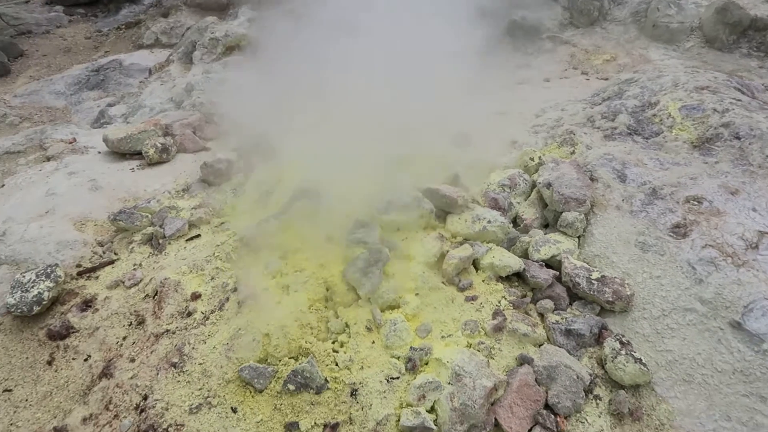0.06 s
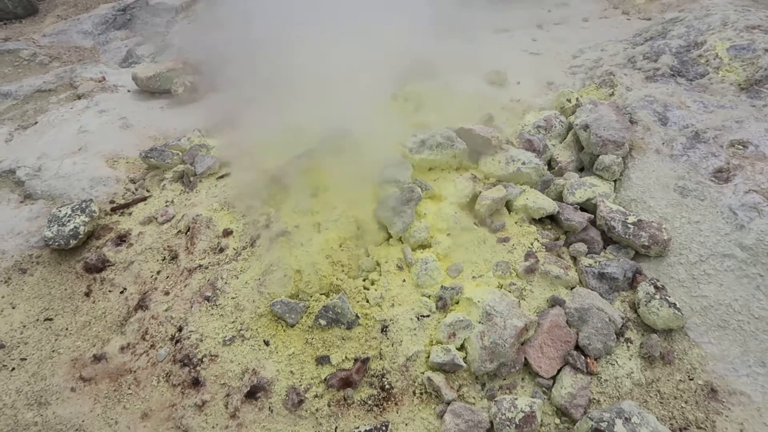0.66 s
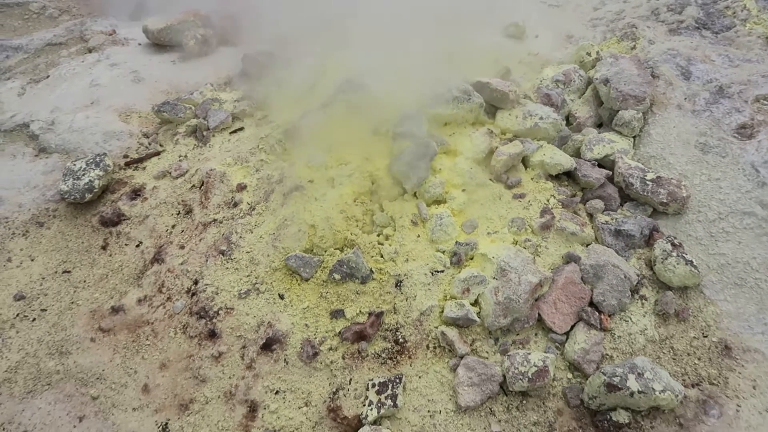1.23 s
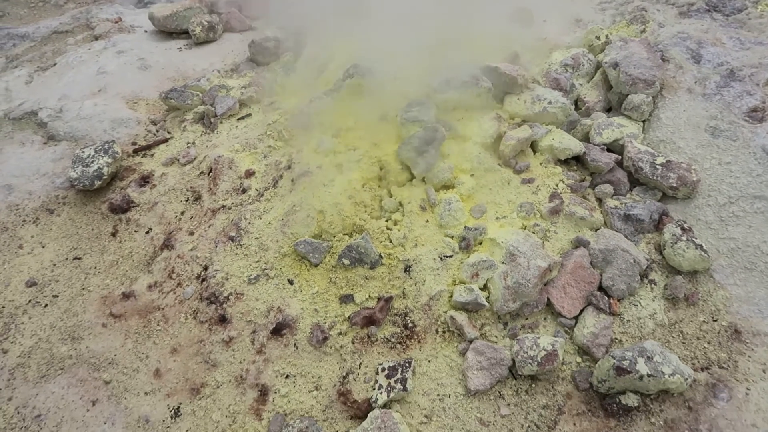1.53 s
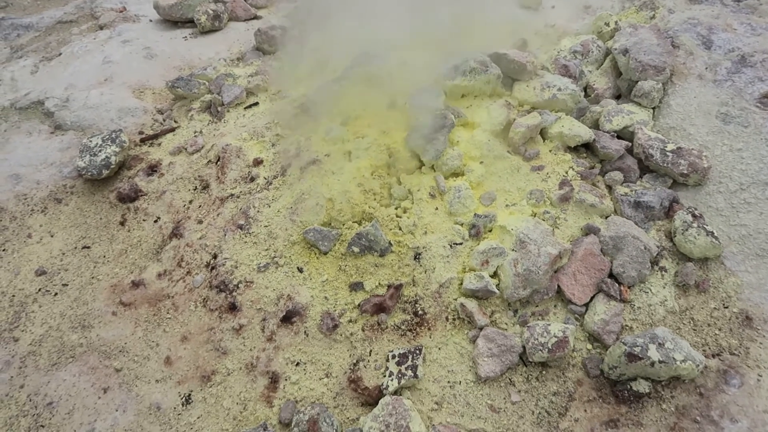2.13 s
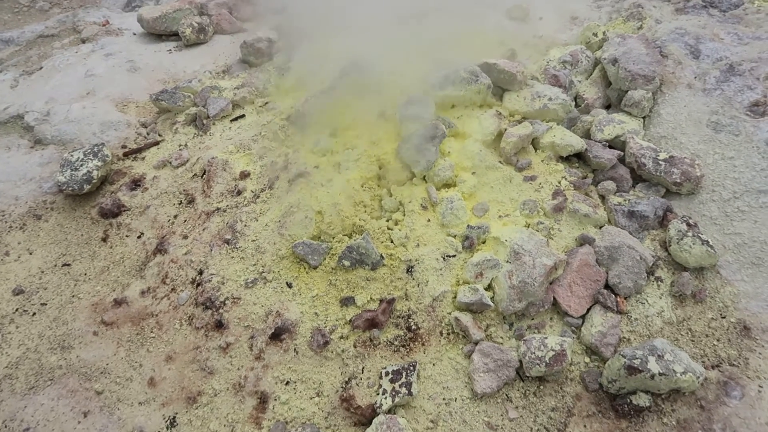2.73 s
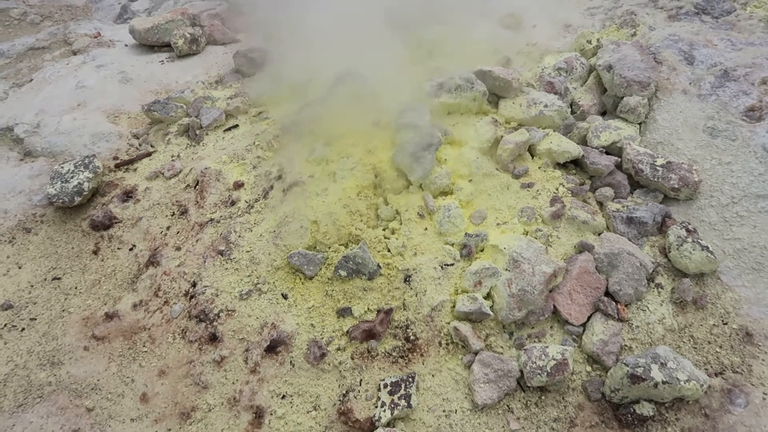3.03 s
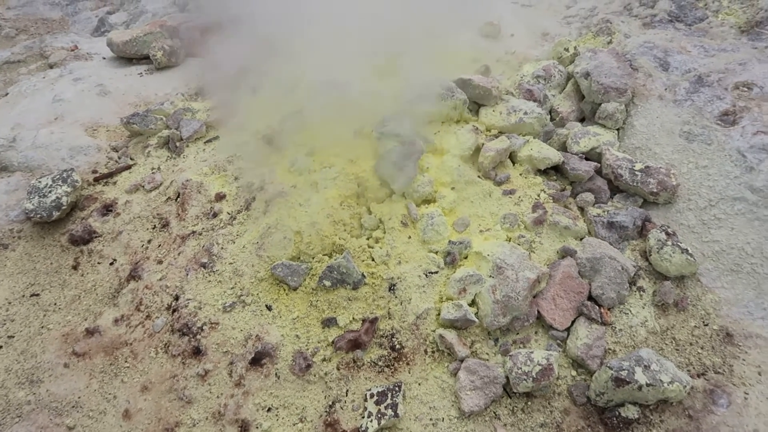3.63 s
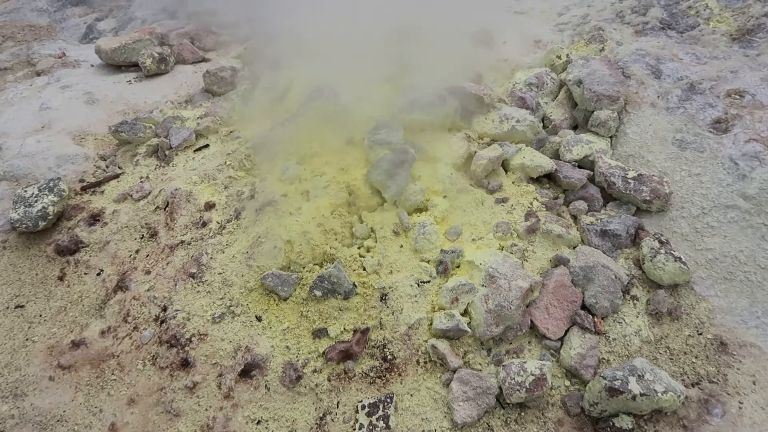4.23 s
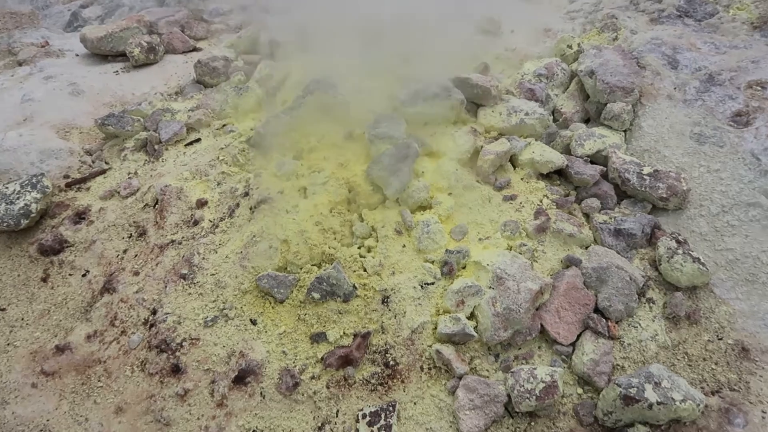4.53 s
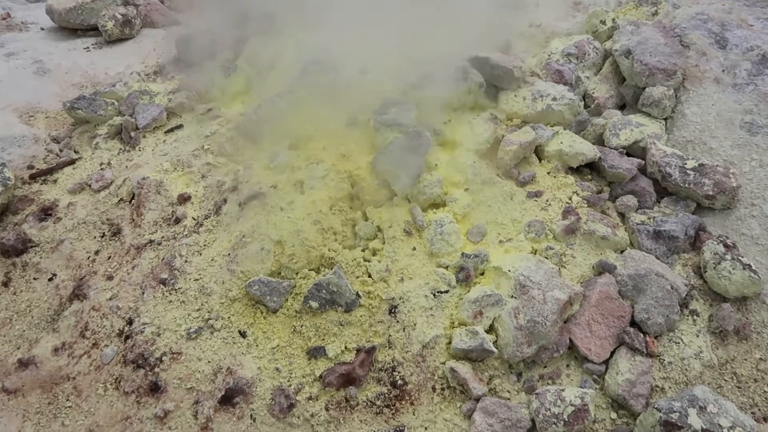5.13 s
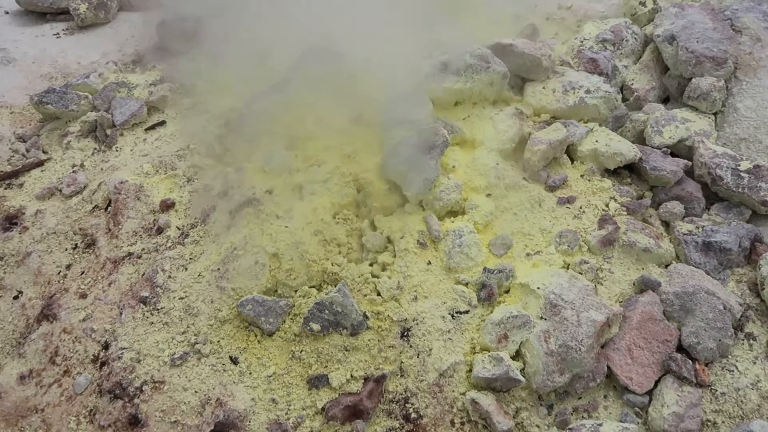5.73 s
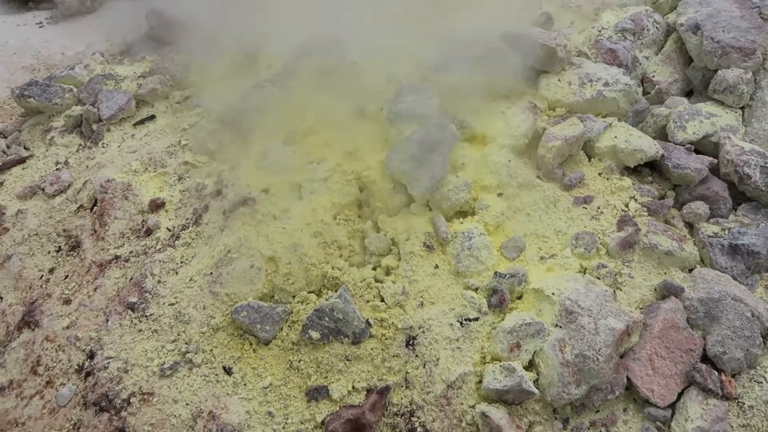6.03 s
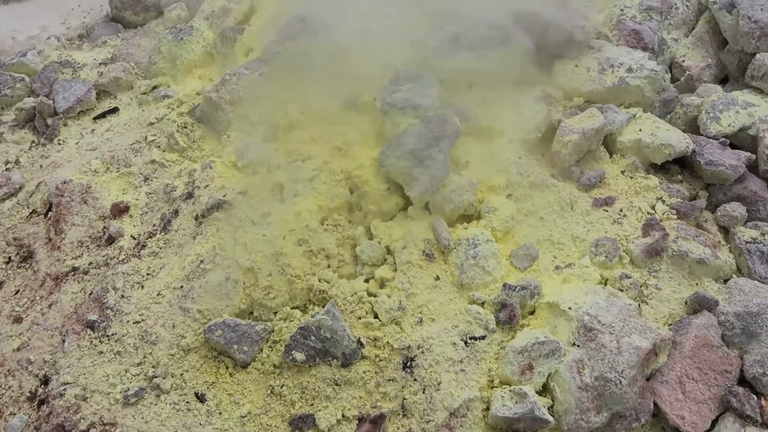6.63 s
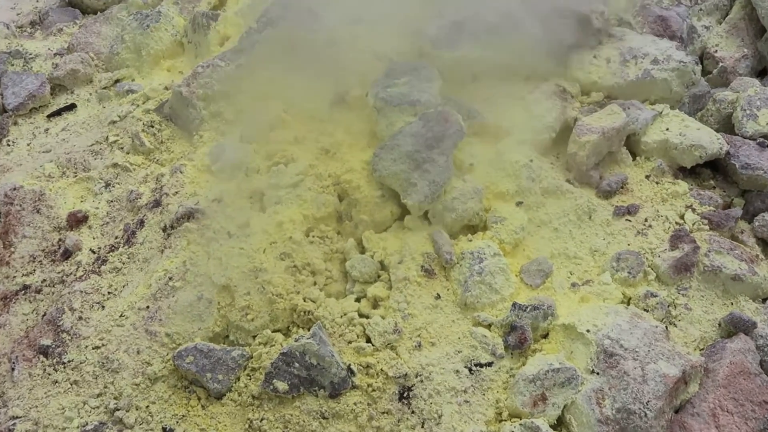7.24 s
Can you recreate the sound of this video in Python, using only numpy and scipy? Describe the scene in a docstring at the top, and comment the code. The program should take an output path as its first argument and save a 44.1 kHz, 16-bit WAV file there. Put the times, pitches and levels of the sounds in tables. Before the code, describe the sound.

A volcanic steam vent roars and hisses continuously for about seven seconds, heard outdoors from a couple of metres away. The sound is a broad rush with a fine sizzle on top and a faintly hollow colour that slides as the microphone moves. Wind hits the microphone from the very start in short, low, slightly raspy thumps over a fluttering rumble. The buffets come in irregular clusters, hardest in the first half second, around 0.9 and 1.4 seconds, between 2 and 2.8 seconds, and near 3.4 seconds. Each hard one pushes the whole sound down, and the hiss swells back over the next second. From about 3.6 seconds the wind eases and the steam comes forward, fullest around 4.5 to 5 seconds. Lighter buffets return between 5 and 6.2 seconds while the steam softens a little, then it hisses on with only faint wind bumps.

```python
"""At a fumarole in a pile of sulphur-crusted stones, a couple of metres from a hand-held camera.
The steam jet roars and hisses steadily; echoes off the ground and the stones give it a hollow colour
that slides as the camera moves. Wind hits the microphone in short, low buffets over a fluttering rumble.
Each hard buffet pushes the recorder's gain down, and the hiss swells back over the next second."""
import sys
import numpy as np
from scipy import signal
from scipy.fft import rfft, irfft, next_fast_len
from scipy.io import wavfile
from scipy.ndimage import uniform_filter1d, map_coordinates

SR = 44100
rng = np.random.default_rng(int(sys.argv[2]) if len(sys.argv) > 2 else 0)


def log_audio(samples):
    """Write samples as a 16-bit WAV file to the path given in sys.argv[1]."""
    # one column per channel
    frames = np.atleast_2d(samples).T
    # limit to full scale, then quantise
    limited = np.clip(frames, -1, 1)
    pcm = np.round(limited * 32767).astype(np.int16)
    wavfile.write(sys.argv[1], SR, pcm)


N = 320607
TIME = np.arange(N) / SR

# rise and fall of the jet at the microphone: time_s, relative_db
JET_LEVEL = [(0, -23), (.45, -23), (.51, -22.5), (.75, -22), (.82, -21), (.9, -20), (1.0, -19.5),
             (1.33, -19.5), (1.55, -22.5), (1.85, -21.5), (2.05, -23), (2.4, -22), (2.7, -23.5),
             (3.02, -21), (3.25, -22.5), (3.5, -19.5), (3.72, -21.3), (4.0, -19.5), (4.14, -20.5),
             (4.38, -18.5), (4.53, -18.5), (4.65, -18.5), (4.9, -19.5), (5.05, -20.5), (5.45, -22.5),
             (5.65, -25.5), (5.95, -22), (6.2, -25.5), (6.6, -24), (6.9, -22.5), (7.27, -22.5)]
# spectrum of the steam: frequency_hz, relative_db
JET_SPECTRUM = [(30, -28), (100, -5), (240, -1.5), (490, -2), (850, -4.5), (1150, -2.5), (1650, -5),
                (2150, -7), (3000, -3.5), (5100, -11), (6400, -12), (8000, -18), (11500, -22),
                (15000, -32.5)]
# cavities between the stones of the vent: pitch_hz, width_hz, boost_db
VENT_CAVITIES = [(650, 180, 4), (995, 117, 4), (1360, 290, 4), (1944, 120, 3), (2547, 270, 4),
                 (3430, 370, 2.5), (4240, 530, 1.3), (6060, 280, 2.5), (6730, 430, 2)]
# sizzle of the fine spray in the jet: time_s, boost_db
SPRAY_SIZZLE = [(0, 1.5), (.55, -1.5), (.72, -2), (.9, 1.5), (1.0, -1), (1.8, 0), (2.08, 1), (2.28, -2.5),
                (2.5, 1), (3.45, -1.3), (4.35, 2), (4.53, -2.5), (4.62, 1), (5.35, 1), (5.65, -1.5),
                (5.97, 0.5), (6.17, 0.5), (6.55, 2), (6.85, -2.5), (7.27, 0)]
# echoes just behind the direct sound: time_s, ground_lag_ms, stone_edge_lag_ms, gain_of_each
NEAR_ECHOES = [(.7, 1.25, 1.34, .16), (1.3, 1.29, 1.64, .1), (2.6, 1.4, 1.8, .07), (3.1, 1.63, 1.94, .1),
               (3.5, 1.67, 1.97, .15)]
# the hollow colour along the camera's path: time_s, peak_hz, peak_db, dip_hz, dip_db
HOLLOW_GLIDE = [(.3, 2780, -1, 2200, 1), (.8, 2800, 1.5, 2100, 0.5), (1.0, 3270, 1.5, 2000, 0.5),
                (1.8, 3290, 1, 1880, -3), (2.5, 3100, 2, 1810, 0), (3.3, 2970, 0, 1620, 0.5),
                (4.2, 2950, 0, 1560, 1)]
# stereo width of the jet, greatest in the treble: frequency_hz, side_gain_db
JET_SIDE_SPECTRUM = [(100, -41), (1200, -110), (2400, -27.5), (4400, -17), (8000, -8.5), (11000, -3.5),
                     (15000, -19)]
# echoes off the flanking stones add or cancel between left and right: centre_hz, width_hz, side_gain_db
FLANK_INTERFERENCE = [(2700, 310, 12), (3400, 470, -23), (4300, 260, 6.5), (4760, 220, 6), (5100, 250, 4),
                      (8700, 1500, -3.5)]
# width of the hiss as the camera moves: time_s, side_gain_db
HISS_SPREAD = [(0, 6.5), (.9, 2.5), (2.6, 1.5), (4.2, 2.5), (6.2, 0), (7.27, 0.5)]

# strength of the wind at the microphone: time_s, relative_db
BREEZE_LEVEL = [(0, -20), (.21, -41), (.72, -46), (.87, -17), (1.17, -21), (1.29, -43), (1.64, -38),
                (1.85, -27.5), (2.4, -20.5), (2.92, -35), (3.1, -26), (3.45, -18.5), (3.66, -45),
                (4.3, -33), (5.0, -34.5), (5.78, -32), (5.98, -17), (6.25, -43), (6.5, -35.5), (7.27, -40)]
# hard eddies that strike the microphone: centre_s, relative_db, length_s, rasp_offset_db
HARD_EDDIES = [(.012, -7, 0.014, -8.5), (.035, -9.5, 0.026, -4.5), (.08, -4, 0.0065, -4.5),
               (.101, -5.5, 0.009, -6), (.121, -8, .007, -11), (.143, -7, 0.0094, 0),
               (.162, -1, 0.0082, -5.5), (.182, -10, 0.011, -9), (.286, -6, 0.0052, -7),
               (.312, -8, 0.011, -4), (.328, -13, 0.016, -5), (.354, -16, 0.0082, -7),
               (.376, -19.5, 0.011, -21.5), (.526, -18, 0.007, -14), (.538, -5, 0.0042, -2.5),
               (.553, -11, 0.0057, -8), (.747, -15.5, .012, -16), (.8, -5, 0.012, -10),
               (.815, -11, 0.014, -16), (.85, -12, .006, -12), (.892, -13, 0.028, -10),
               (.923, -2.5, 0.0072, 1.5), (.953, -6, 0.021, -9), (.98, -15, 0.014, -6),
               (1.0, -13, 0.0085, 9), (1.021, -10.5, 0.016, -10), (1.047, -15, 0.01, -20),
               (1.066, -15, 0.011, -16), (1.089, -9.5, 0.0062, -6), (1.16, -12, 0.025, -3),
               (1.19, -11, 0.016, -2), (1.213, -5.5, 0.012, 0.5), (1.33, -4, 0.0084, -6),
               (1.397, -1, 0.019, -13), (1.42, 3, 0.0083, -5.5), (1.473, -8, .026, -11.5),
               (1.532, -13, 0.0091, -14), (1.706, -13.5, 0.022, -18), (1.806, -10.5, 0.013, -12),
               (1.833, -10.5, 0.0053, -9), (1.869, -8.5, 0.012, -10), (1.942, -13.5, 0.0042, -25),
               (2.015, -3, 0.013, -8), (2.144, -11, 0.025, -13.5), (2.18, -13, 0.011, -15),
               (2.277, -10.5, 0.011, -17), (2.311, -18, 0.0063, -24), (2.348, -10, 0.016, -16),
               (2.424, -6.5, 0.015, -5.5), (2.457, -12, 0.0081, -13), (2.508, -24, .012, -19),
               (2.568, -15, 0.0094, -12), (2.587, -6.5, 0.0066, -12.5), (2.627, -5.5, 0.013, -10),
               (2.683, -11, 0.0084, -12), (2.732, -13.5, 0.026, -11), (2.801, -3.5, 0.0053, -8),
               (2.836, -6.5, 0.015, -14.5), (2.873, -15, 0.015, -19.5), (2.969, -19.5, 0.0085, -25),
               (3.05, -19, 0.011, -26), (3.073, -9.5, 0.01, -7.5), (3.108, -16, 0.013, -12),
               (3.143, -9, 0.024, -7.5), (3.162, -1, 0.0032, -8.5), (3.21, -14, 0.015, -13.5),
               (3.353, 0.5, 0.0089, -5.5), (3.374, 0.5, 0.0093, -14), (3.424, -2.5, 0.012, -5),
               (3.46, -10, 0.014, -14), (3.556, -9, 0.015, -11), (3.705, -23, 0.018, -21),
               (3.825, -23, 0.0096, -23), (3.945, -27, .022, -25), (4.052, -12, 0.028, -15),
               (4.135, -29, 0.028, -22), (4.249, -13, 0.026, -14.5), (4.286, -17.5, 0.015, -24),
               (4.325, -23, 0.013, -18), (4.39, -25.5, 0.0091, -18), (4.435, -19, 0.0073, -26),
               (4.448, -5, 0.0065, -17), (4.485, -13.5, 0.0069, -12), (4.584, -18, .007, -17),
               (4.601, -15.5, 0.0068, -22), (4.712, -20, 0.018, -17.5), (4.782, -13.5, 0.012, -16),
               (4.803, -8, 0.0053, -12), (4.826, -17, 0.0052, -20), (4.904, -21.5, 0.01, -14),
               (4.94, -22.5, .018, -19), (5.012, -24, 0.0052, -30), (5.078, -12.5, 0.013, -17.5),
               (5.101, -12, .006, -12), (5.128, -10, 0.022, -12), (5.172, -21, .007, -18),
               (5.284, -8, 0.018, -9), (5.319, -10.5, 0.0066, -6), (5.376, -14, 0.02, -20),
               (5.399, -19, .008, -20), (5.425, -12.5, 0.019, -11), (5.468, -22, 0.0096, -14),
               (5.556, -8.5, 0.0037, -14), (5.578, -20, 0.032, -20), (5.68, -25, 0.01, -23),
               (5.7, -10.5, 0.0037, -16), (5.759, -19, 0.0058, -17), (5.864, -18.5, 0.024, -21.5),
               (5.921, -15.5, 0.013, -11), (5.948, -10.5, 0.015, -12), (5.987, -9, 0.0048, -11),
               (6.02, -20, 0.0091, -10), (6.064, -10.5, 0.0046, -14.5), (6.098, -17, 0.018, -19),
               (6.164, -12.5, 0.029, -13), (6.332, -27, 0.0057, -23.5), (6.361, -23.5, 0.006, -24),
               (6.43, -27, 0.0099, -20), (6.5, -25, 0.018, -20), (6.572, -30, 0.0059, -21),
               (6.649, -17, 0.015, -11), (6.803, -18.5, 0.012, -18), (6.996, -24, 0.0053, -28),
               (7.083, -15, 0.0064, -19), (7.126, -28, .009, -24), (7.203, -21, 0.018, -26.5)]
# rumble and thump of the wind: frequency_hz, relative_db
WIND_SPECTRUM = [(20, -50), (45, -20), (70, -13), (100, -9.5), (150, -4), (250, 0.5), (470, 0), (530, -7),
                 (740, -11.5), (880, -65), (1600, -57), (4000, -71)]
# rasp of the eddies: frequency_hz, relative_db
RASP_SPECTRUM = [(400, -40), (640, 8), (850, 9), (1100, 1), (1400, -0.5), (1850, -9.5), (3000, -25),
                 (8000, -40)]
# the part of the buffets that differs between the microphone ports: frequency_hz, relative_db
WIND_SIDE_SPECTRUM = [(60, -23), (160, -13), (300, 14.5), (430, 21.5), (600, 17), (1200, -23), (2500, -7),
                      (8000, -18)]
# the part of the rasp that differs between the ports: frequency_hz, relative_db
RASP_SIDE_SPECTRUM = [(400, -44), (700, 6), (950, 9), (1400, 0), (2000, -5.5), (2800, -6), (4000, -36),
                      (8000, -45)]


def vent(gain_db=3.0, flank_lag_ms=0.89, flank_db=-5.0, scatter_db=-3.5):
    """The jet from a couple of metres, with its echoes; flanking stones widen the treble."""
    ground_ms, edge_ms, echo_gain = curves(NEAR_ECHOES)
    jet = steam()
    # the rough crust mirrors only the longer waves, and a wave bent at an edge comes back inverted
    mirrored, _ = split(jet, hz=9000)
    echoes = echo_gain * (delayed(mirrored, ground_ms) - delayed(mirrored, edge_ms))
    mid = sliding_hollow(jet + echoes)
    reflection = undb(flank_db) * delayed(jet, flank_lag_ms)
    scatter = undb(scatter_db) * steam()
    side = colour(reflection + scatter, JET_SIDE_SPECTRUM, FLANK_INTERFERENCE)
    side *= undb(curves(HISS_SPREAD)[0])
    return np.array([mid + side, mid - side]) * undb(curves(JET_LEVEL)[0] + gain_db)


def steam(surge_db=0.43, roar_flutter_db=0.6, hiss_flutter_db=0.62, spray_flutter_db=1.5):
    """Large eddies roar, small ones hiss, fine spray sizzles; all surge together, each flutters alone."""
    roar, treble = split(noise(JET_SPECTRUM, VENT_CAVITIES), hz=1690)
    hiss, spray = split(treble, hz=6700)
    roar = roar * undb(roar_flutter_db * wander(rate_hz=37))
    hiss = hiss * undb(hiss_flutter_db * wander(rate_hz=37))
    spray = spray * undb(curves(SPRAY_SIZZLE)[0] + spray_flutter_db * wander(rate_hz=48))
    return (roar + hiss + spray) * undb(surge_db * wander(rate_hz=32))


def sliding_hollow(x, peak_width_hz=300, dip_width_hz=420):
    """A ringing gap and a cancelled band, both shifting in pitch and strength as the camera moves in."""
    peak_hz, peak_db, dip_hz, dip_db = curves(HOLLOW_GLIDE)
    ringing = x + (undb(peak_db) - 1) * band(x, peak_hz, peak_width_hz)
    return ringing + (undb(dip_db) - 1) * band(ringing, dip_hz, dip_width_hz)


def wind(boom_db=-0.3, thump_db=1.77, rasp_db=-0.5, breeze_db=-4, flutter_db=4,
         side_db=-23.5, side_rasp_db=-9):
    """Eddies boom, thump and rasp right on the microphone, over a fluttering rumble."""
    boom, thump, rasp = eddies()
    breeze = undb(curves(BREEZE_LEVEL)[0] + breeze_db + flutter_db * wander(rate_hz=30))
    deep_pressure = np.hypot(boom * undb(boom_db), breeze)
    body_pressure = np.hypot(thump * undb(thump_db), breeze)
    deep, body = split(churn(WIND_SPECTRUM), hz=284)
    mid = deep_pressure * deep + body_pressure * body + undb(rasp_db) * rasp * churn(RASP_SPECTRUM)
    # both ports feel nearly the same; the smaller the eddy, the more they differ
    side = undb(side_db) * body_pressure * noise(WIND_SIDE_SPECTRUM)
    side += undb(side_rasp_db) * rasp * noise(RASP_SIDE_SPECTRUM)
    return np.array([mid + side, mid - side])


def eddies(rise_steepness=2.0, fall_steepness=1.65, thinning=0.87, usual_rasp_db=-12):
    """Envelopes of boom, thump and rasp: each eddy hits within milliseconds and trails a short wake."""
    power = np.zeros((3, N))
    for centre_s, level_db, length_s, rasp_db in list(HARD_EDDIES) + small_eddies():
        near = slice(max(int((centre_s - .1) * SR), 0), int((centre_s + .1) * SR))
        age = 2 * (TIME[near] - centre_s) / length_s
        steepness = np.where(age < 0, rise_steepness, fall_steepness)
        # small, fast eddies rasp more and boom less
        boom_db = level_db - thinning * (rasp_db - usual_rasp_db)
        peak_power = undb([[boom_db], [level_db], [level_db + rasp_db]]) ** 2
        power[:, near] += peak_power / (1 + np.abs(age) ** (2 * steepness))
    return np.sqrt(power)


def small_eddies(per_s=18, lift_db=5.5, scatter_db=4, length_s=0.0072, rasp_db=-23):
    """Light buffets at chance moments, following the wind's strength; rows as in HARD_EDDIES."""
    count = int(per_s * N / SR)
    jitter, size = rng.random((count, 2)).T
    times_s = (np.arange(count) + jitter) / per_s
    levels_db = np.interp(times_s, *np.transpose(BREEZE_LEVEL)) + lift_db + scatter_db * (2 * size - 1)
    return [(centre_s, level_db, length_s, rasp_db) for centre_s, level_db in zip(times_s, levels_db)]


def churn(spectrum, span_s=0.0115):
    """Turbulence whose strength stays even over the life of one eddy."""
    turbulence = noise(spectrum)
    local_power = uniform_filter1d(turbulence ** 2, int(span_s * SR))
    return turbulence / np.sqrt(local_power + 0.095)


def gain_control(x, ceiling_db=-11.5, recovery_db_per_s=8, detector_s=0.0082, attack_s=0.0019,
                 start_duck_db=12):
    """The recorder's gain starts low, climbs steadily and drops fast when the level tops the ceiling."""
    power = uniform_filter1d(np.mean(x ** 2, axis=0), int(detector_s * SR))
    excess_db = np.maximum(10 * np.log10(np.maximum(power, 1e-12)) - ceiling_db, 0)
    recovered_db = recovery_db_per_s * TIME
    wanted_db = np.maximum.accumulate(np.maximum(excess_db + recovered_db, start_duck_db)) - recovered_db
    pole = np.exp(-1 / (attack_s * SR))
    duck_db = start_duck_db + signal.lfilter([1 - pole], [1, -pole], wanted_db - start_duck_db)
    return x * undb(-duck_db)


def undb(db):
    """Decibels to gain."""
    return 10 ** (np.asarray(db) / 20)


def curves(table):
    """The columns of a table, joined by straight lines in time."""
    times_s, *columns = np.transpose(table)
    return [np.interp(TIME, times_s, column) for column in columns]


def colour(x, spectrum, peaks=()):
    """Filter by frequency_hz, gain_db points, with centre_hz, width_hz, boost_db resonances on top."""
    size = next_fast_len(N)
    points_hz, points_db = np.transpose(spectrum)
    bins_hz = np.maximum(np.fft.rfftfreq(size, 1 / SR), 1)
    gain_db = np.interp(np.log(bins_hz), np.log(points_hz), points_db)
    for centre_hz, width_hz, boost_db in peaks:
        gain_db += boost_db / (1 + (2 * (bins_hz - centre_hz) / width_hz) ** 2)
    return irfft(rfft(x, size) * undb(gain_db), size)[:N]


def noise(spectrum, peaks=()):
    """Turbulence of a given colour, rms 1."""
    x = colour(rng.standard_normal(N), spectrum, peaks)
    return x / x.std()


def wander(rate_hz):
    """A smooth random drift, standard deviation 1."""
    steps = rng.standard_normal(N // 50)
    drift = map_coordinates(steps, [TIME * rate_hz], order=2, mode="wrap")
    return drift / drift.std()


def split(x, hz):
    """The parts of a sound under and over a frequency."""
    low = signal.sosfiltfilt(signal.butter(2, hz, fs=SR, output="sos"), x)
    return low, x - low


def delayed(x, lag_ms):
    """A sound heard after a steady or moving lag."""
    return map_coordinates(x, [np.arange(N) - lag_ms * SR / 1000], order=3)


def band(x, centre_hz, width_hz):
    """Band-pass with a moving centre, gain 1 there."""
    carrier = np.exp(2j * np.pi * np.cumsum(centre_hz) / SR)
    pole = np.exp(-np.pi * width_hz / SR)
    return 2 * np.real(carrier * signal.lfilter([1 - pole], [1, -pole], x * carrier.conj()))


def scene():
    """Open air: steam a couple of metres off, wind on the microphone."""
    return vent() + wind()


def record(dry, top_hz=15150):
    """The camera's recorder ducks under the buffets, rounds the highest peaks and cuts the top."""
    ducked = gain_control(dry)
    rounded = ducked / (1 + ducked ** 10) ** (1 / 10)
    return signal.sosfilt(signal.ellip(10, .1, 80, top_hz, fs=SR, output="sos"), rounded)


dry = scene()
out = record(dry)
log_audio(out)
```